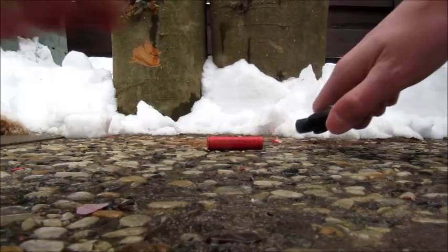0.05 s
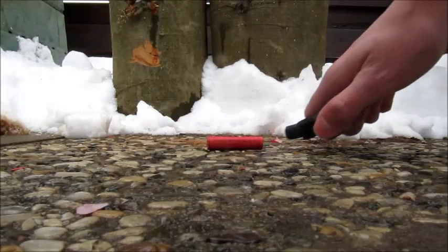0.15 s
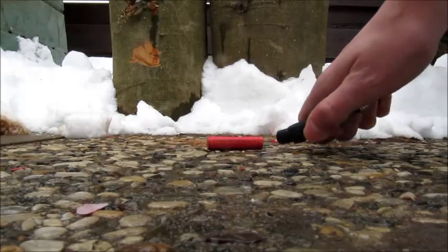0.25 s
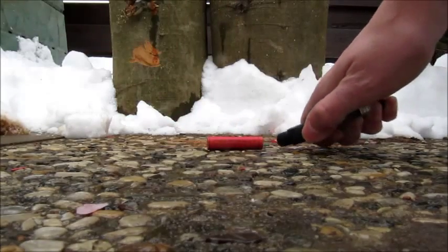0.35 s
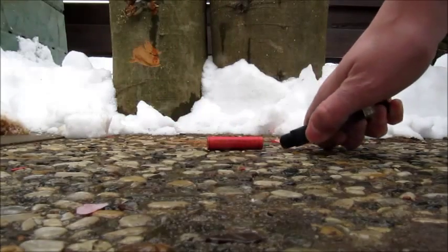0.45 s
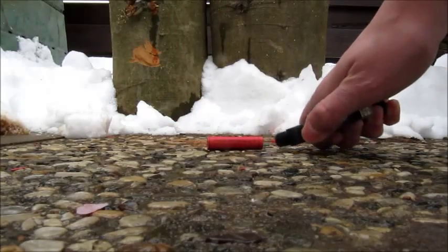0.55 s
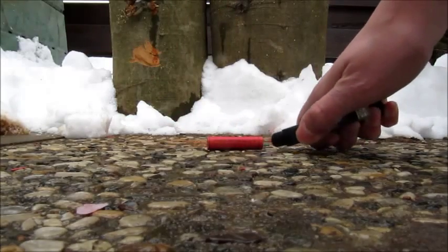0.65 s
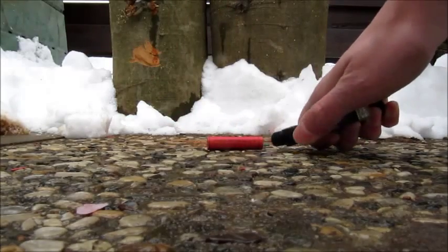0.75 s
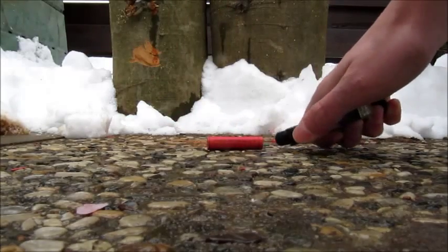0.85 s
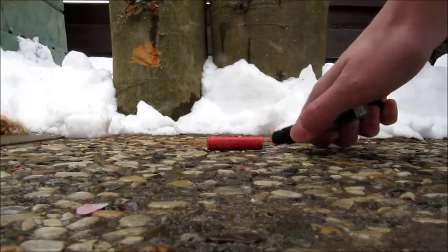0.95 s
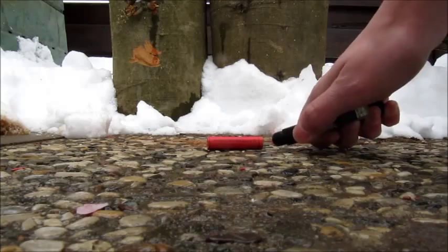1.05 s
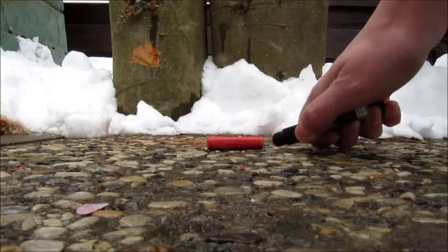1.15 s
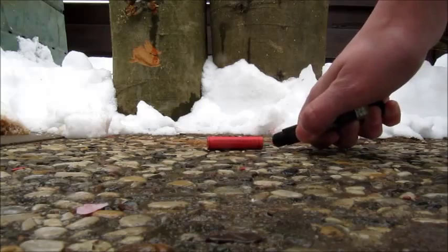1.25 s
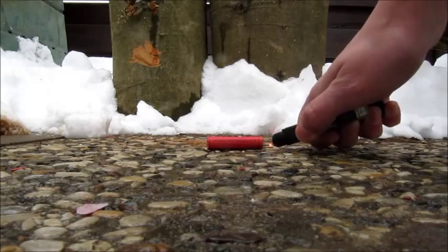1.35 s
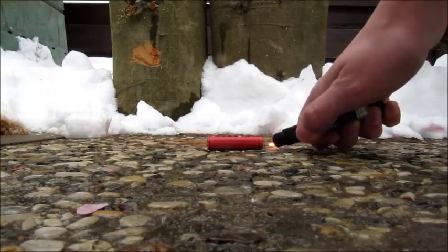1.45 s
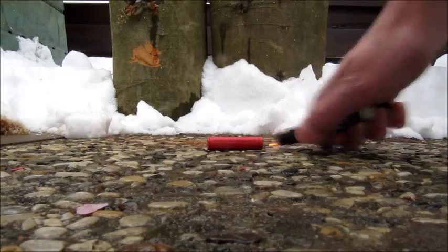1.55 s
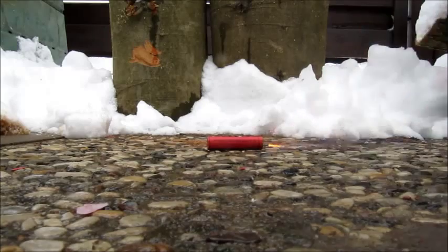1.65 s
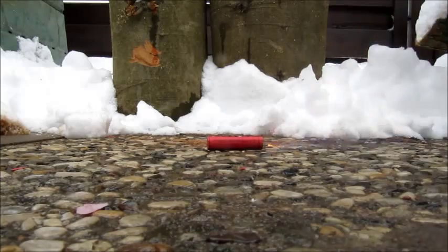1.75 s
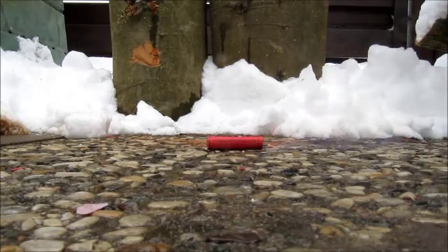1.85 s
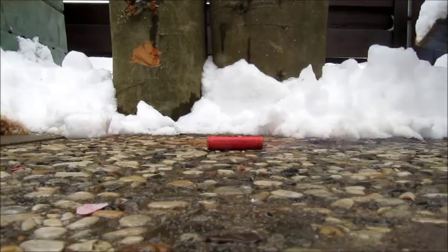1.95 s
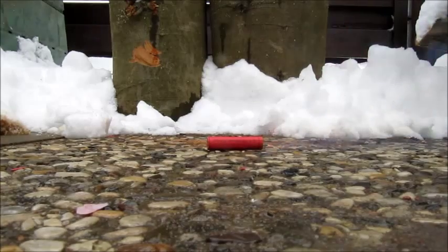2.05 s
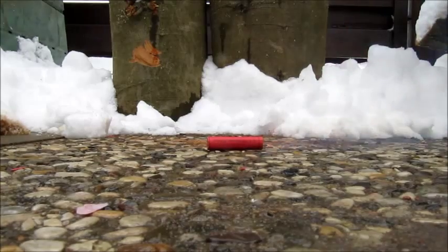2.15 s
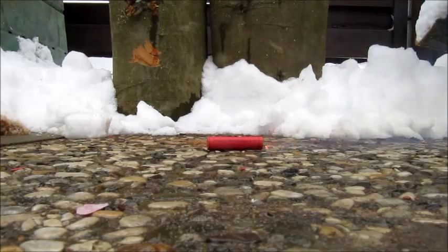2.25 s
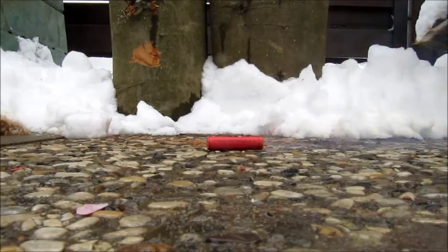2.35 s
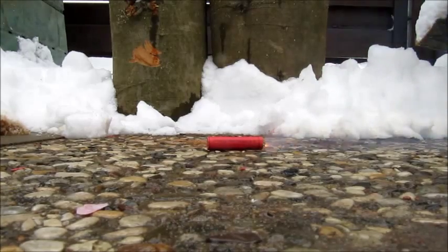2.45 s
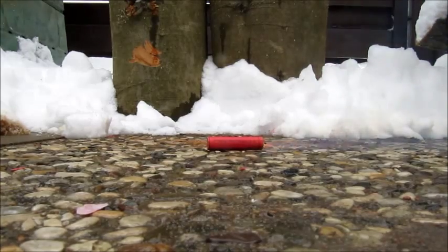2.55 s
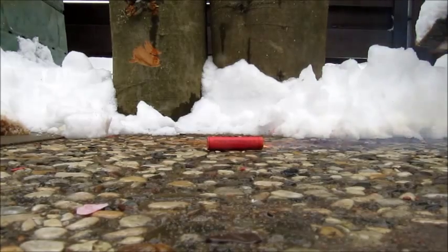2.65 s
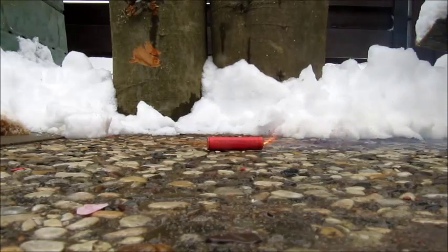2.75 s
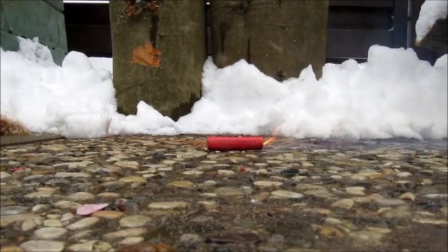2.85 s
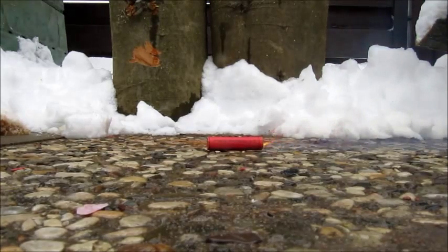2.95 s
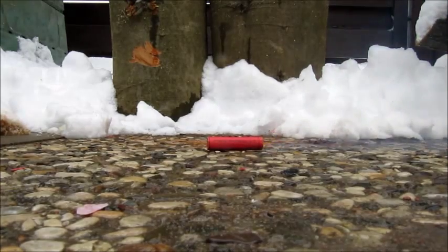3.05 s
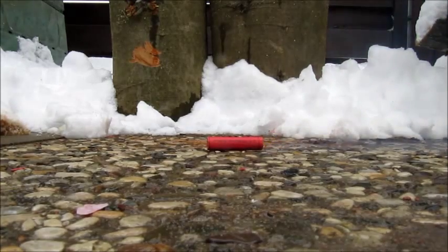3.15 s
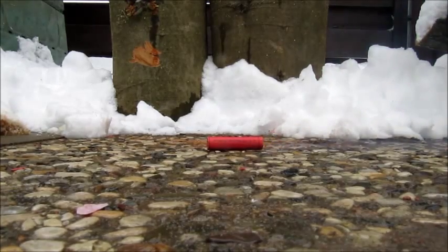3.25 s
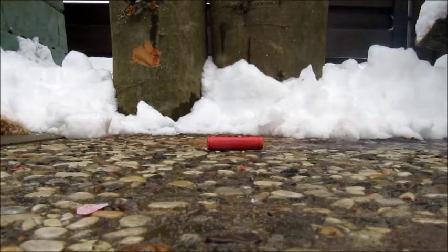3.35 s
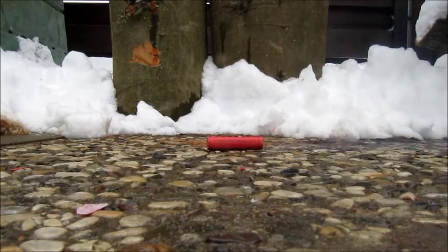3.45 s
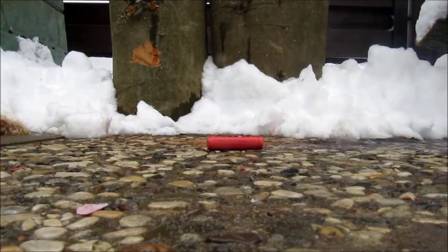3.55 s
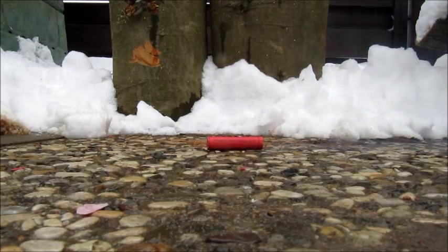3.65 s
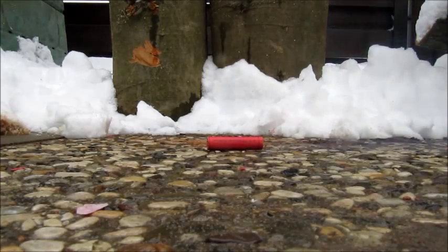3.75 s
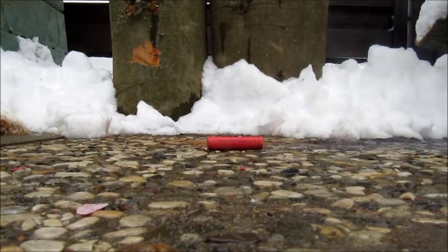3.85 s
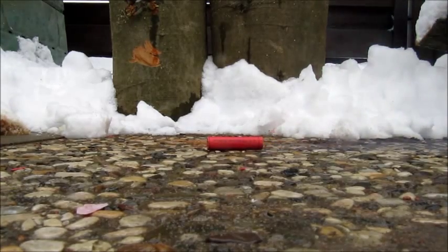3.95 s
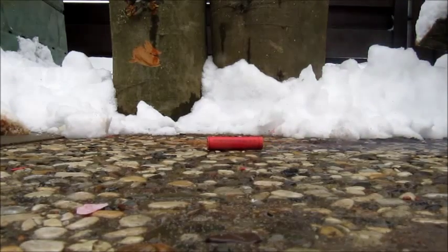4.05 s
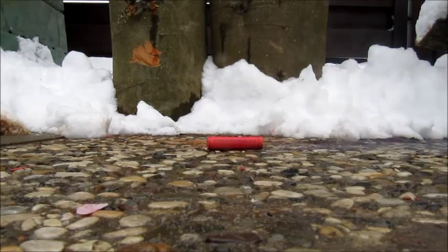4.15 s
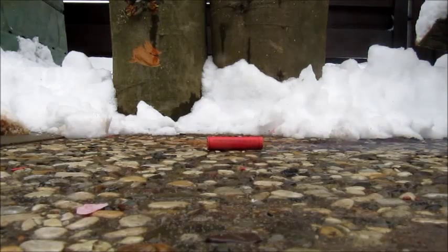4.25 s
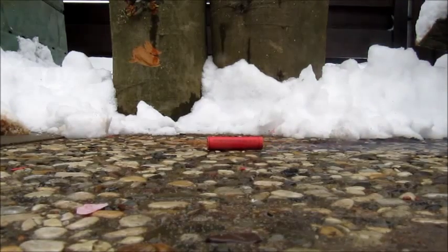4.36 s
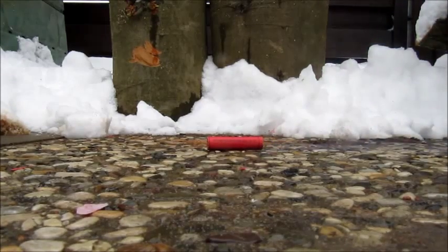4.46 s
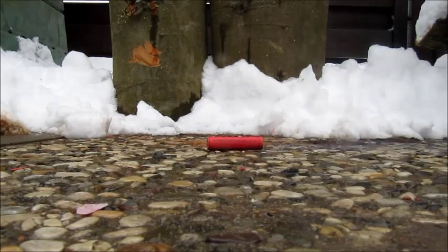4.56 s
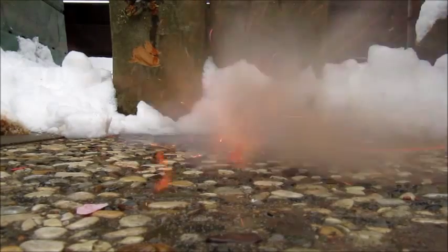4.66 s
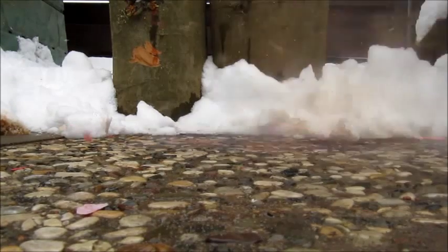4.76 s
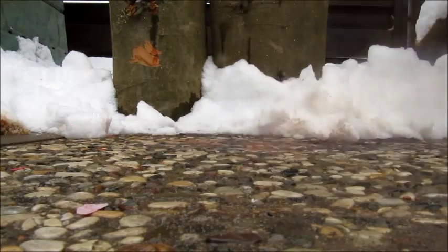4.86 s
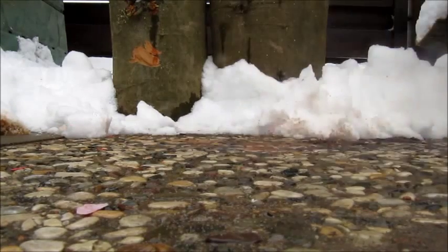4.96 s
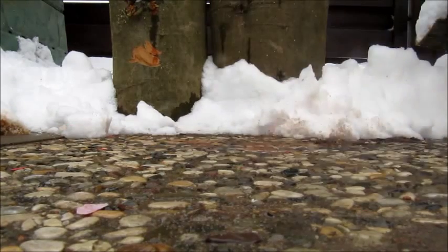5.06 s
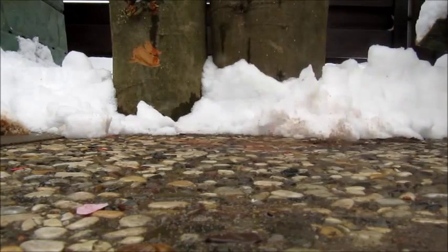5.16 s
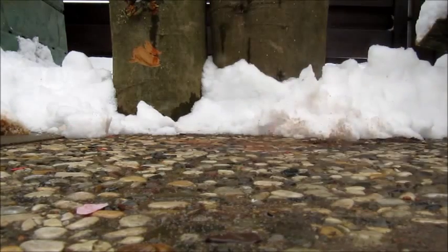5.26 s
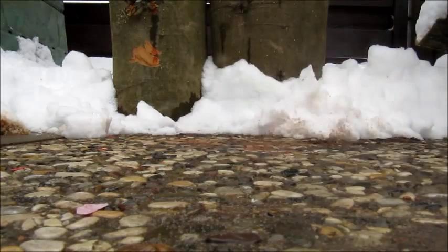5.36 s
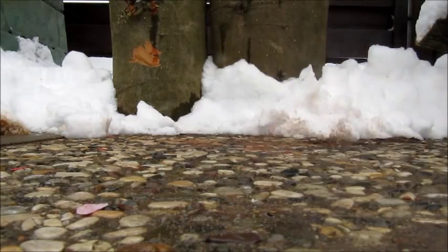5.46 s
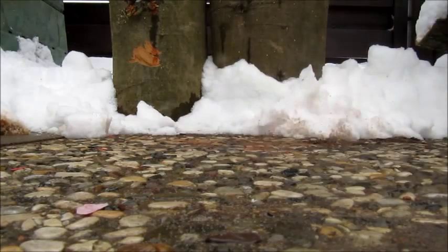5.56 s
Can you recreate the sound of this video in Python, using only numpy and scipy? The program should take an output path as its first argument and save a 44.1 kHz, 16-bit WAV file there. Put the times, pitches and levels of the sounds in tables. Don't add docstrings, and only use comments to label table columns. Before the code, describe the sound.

Close outdoor recording in a small fenced yard. Wind buffets, then gas hisses as a lighter clicks sharply several times. A fuse catches, fizzing brightly with crackles, shrinks to a faint smoulder, then one violent distorted bang with short fence echoes. Small bits tick onto stone, and a torn shell clacks down.

```python
import sys
import numpy as np
from scipy import signal
from scipy.fft import rfft, irfft
from scipy.io import wavfile
from scipy.ndimage import uniform_filter1d

SR = 44100
rng = np.random.default_rng(int(sys.argv[2]) if len(sys.argv) > 2 else 0)


def transcribe(signal):
    frames = np.atleast_2d(signal).T
    limited = np.clip(frames, -1, 1)
    pcm = np.round(limited * 32767).astype(np.int16)
    wavfile.write(sys.argv[1], SR, pcm)


def ratio(d):
    e = np.asarray(d, float) / 20
    return 10 ** e


N = 247519
SPLIT_S = 2.715


def evened(x):
    return x / np.sqrt(np.mean(x ** 2) + 1e-20)


def read(points, hz):
    f, value = np.transpose(points)
    return np.interp(np.log(hz + 1), np.log(f + 1), value)


def columns(rows, t):
    s, *rest = np.transpose(rows)
    return [np.interp(t, s, c) for c in rest]


def hump(t, s, length):
    return ((t - s) / (length / 2)) ** 2


def add(mix, s, sound):
    part = mix[round(s * SR):][:len(sound)]
    part += sound[:len(part)]


def coloured(x, spectrum, lo=0, hi=SR):
    hz = np.fft.rfftfreq(len(x), 1 / SR) + 1
    edges = 1 / np.sqrt((1 + (lo / hz) ** 12) * (1 + (hz / hi) ** 12))
    return evened(irfft(rfft(x) * ratio(read(spectrum, hz)) * edges, len(x)))


def resonate(x, hz, width):
    turn = np.exp(2j * np.pi * np.cumsum(hz * np.ones(len(x))) / SR)
    r = np.exp(-np.pi * width / SR)
    slow = signal.lfilter([1 - r], [1, -r], x / turn)
    slow = signal.lfilter([1 - r], [1, -r], slow)
    return evened((turn * slow).real)


def flicker(ms):
    size = max(int(ms * SR / 1000), 2)
    return evened(uniform_filter1d(uniform_filter1d(rng.standard_normal(N), size), size))


def gain_db():
    # start in seconds, gain after it in dB.
    ducks = [
        (0.09, -1.5),
        (0.42, -23),
        (1.232, -15.5),
        (4.69, -27.5),
    ]
    climb_db_per_s, rest_db = 13.5, -9.5
    t, out = np.arange(N) / SR, np.zeros(N)
    for s, after_db in ducks:
        climbing = after_db + climb_db_per_s * (t - s)
        out = np.where(t < s, out, np.minimum(climbing, max(after_db, rest_db)))
    return uniform_filter1d(out, size=200)


def yard():
    # frequency in Hz, level in dB per Hz.
    murmur_spectrum = [(59, -30), (100, 0), (198, -13.5), (344, -17.5), (426, -7), (2900, -19.5),
                       (3590, -22), (5990, -24), (8970, -21), (16300, -41.5)]
    # middle in seconds, length in seconds, level in dB, pitch in Hz.
    tyres = [
        (5.041, .03, -70, 1380),
        (5.405, 0.18, -69.5, 1624),
    ]
    hush = coloured(rng.standard_normal(N), murmur_spectrum, 140)
    t, road = np.arange(N) / SR, rng.standard_normal(N)
    whine = 0
    for s, length, db, hz in tyres:
        whine = whine + ratio(db - 7.8 * hump(t, s, length) ** 2) * resonate(road, hz, 370)
    car_db = 7 * np.exp(-hump(t, *tyres[1][:2]))
    return ratio(-56 + gain_db() + car_db + 1.6 * flicker(60)) * hush + whine


def wind():
    # frequency in Hz, level in dB per Hz.
    gust_spectrum = [(12, -36), (20, 6), (92, -1.5), (232, -10), (335, -14), (447, -16.5), (491, -17.5),
                     (805, -27), (900, -31.5), (1170, -44), (1980, -120)]
    # time in seconds, pressure in dB.
    breeze = [(0, -39.5), (.4, -42.5), (1.0, -48), (1.9, -56.5), (2.75, -38.5), (3.25, -36), (3.98, -31.5),
              (4.25, -52.5), (5.61, -44)]
    # middle in seconds, length in seconds, pressure in dB, flutter over pressure in dB.
    gusts = [(0.079, 0.15, -29, -7.5), (0.324, 0.068, -37.5, -22), (0.497, 0.055, -56, -23),
             (0.597, 0.033, -52.5, 0.5), (0.672, 0.061, -48.5, -12), (0.765, 0.036, -49, -17),
             (0.888, 0.14, -45.5, -24), (0.963, 0.045, -49.8, -28), (1.1, 0.059, -65, -18),
             (1.47, 0.056, -52, -15), (1.715, 0.041, -50, -18), (1.86, 0.038, -74, -0.3),
             (2.1, 0.063, -53.5, -4.5), (2.224, 0.048, -61, 3), (2.67, 0.082, -60, 9),
             (2.98, 0.08, -40, 1.5), (3.29, 0.33, -39.6, 2.8), (3.498, 0.056, -37, -1.5),
             (3.65, 0.06, -36.5, -7.5), (3.719, 0.04, -35.5, -3.5), (3.811, 0.057, -37.5, 0.5),
             (3.892, 0.018, -35, -9), (3.956, 0.034, -42, -7), (4.143, 0.081, -41, 1),
             (4.362, 0.079, -44.5, -19), (4.487, 0.039, -46, -26.5), (4.889, 0.04, -47, -32),
             (5.217, 0.08, -65, -22.5), (5.312, 0.04, -66.5, -13.5), (5.49, 0.038, -53.5, -20)]
    # time in seconds, peak in dB, pitch in Hz.
    buffets = [(0.043, -9, 83), (0.066, -12, 139), (0.078, -8.5, 72.6), (0.12, -18, 276),
               (0.291, -27.5, 74.5), (0.591, -42, 124), (0.658, -40.5, 61.9), (0.955, -39.5, 79),
               (1.2245, -35.5, 260), (1.711, -47, 61.9), (2.948, -36, 81.6), (2.988, -32, 216),
               (3.238, -23.5, 222), (3.258, -23, 83), (3.294, -23, 235), (3.339, -29, 167),
               (3.401, -27, 111), (3.428, -26, 89), (3.457, -25, 91.5), (3.499, -22, 133),
               (4.126, -26.5, 112), (4.879, -39, 80.7)]
    flutter_base_db, flutter_growth, gust_edge_db = -10, 0.93, -9.5
    t = np.arange(N) / SR
    slow = t[::64]
    breeze_db = columns(breeze, slow)[0] + np.interp(slow, t, gain_db())
    rumble = ratio(2 * breeze_db)
    flutter = ratio(2 * (flutter_base_db - 48 + flutter_growth * (breeze_db + 48)))
    for s, length, db, over_db in gusts:
        steeper_rise = np.where(slow < s, 1.8, 1)
        power = ratio(2 * (db + gust_edge_db * hump(slow, s, length) * steeper_rise))
        rumble = rumble + power
        flutter = flutter + ratio(2 * over_db) * power
    rumble_db = np.interp(t, slow, 10 * np.log10(rumble))
    flutter_db = np.interp(t, slow, 10 * np.log10(flutter))
    air = ratio(0.58 * flicker(37) + 3.4 * flicker(6.4)) * rng.standard_normal(N)
    edge_db = np.minimum(flutter_db, -38) - 12.5 + 1.3 * np.minimum(flutter_db + 35.5, 0)
    edge_db += 5.5 * flicker(12.0)
    out = ratio(rumble_db - 2.5) * coloured(air, gust_spectrum, 0, 110)
    out += ratio(flutter_db - 3.5) * coloured(air, gust_spectrum, 150, 300)
    out += ratio(edge_db) * coloured(air, gust_spectrum, 310)
    for s, db, hz in buffets:
        turns = np.arange(-1.5, 1.5, hz / SR)
        swing = np.sin(2 * np.pi * turns) * np.exp(-(turns / 0.4) ** 2)
        add(out, max(s + 0.0029 - 1 / hz, 0), ratio(db - 3.5) * swing)
    return out


def scrap(s, db, hz, ms):
    # frequency in Hz, level in dB per Hz.
    card_spectrum = [(120, -49.5), (200, -19), (2540, -16), (3110, -10), (4330, -12.5), (10100, -1.5),
                     (12400, -11), (16300, -33)]
    t = np.arange(2000) / SR
    burst = rng.standard_normal(2000)
    tick = 1.2 * min(hz / 8000, 1) * coloured(burst, card_spectrum) + resonate(burst, hz, 2400)
    tick *= ratio(-8 * (t * 1000 / ms) ** 1.6) * np.clip(t / 0.00034, 0, 1)
    return s - .0002, ratio(db) * tick / abs(tick).max()


def gas(rows, middle_db):
    # frequency in Hz, width in Hz.
    hollows = [(4200, 1200), (7000, 1200)]
    t = np.arange(rows[0][0] - .01, rows[-1][0] + 0.013, 1 / SR)
    flow_db, hz, turned = columns(rows, t)
    top_db = flow_db + gain_db()[round(t[0] * SR):][:len(t)]
    nozzle_db = -26.5 * turned
    air = rng.standard_normal(2 * SR)[:len(t)]
    jet = resonate(air, hz, 1500) + 0.08 * resonate(air, hz, 5000)
    jet -= ratio(middle_db) * resonate(air, *hollows[1])
    jet += ratio(nozzle_db) * resonate(air, *hollows[0])
    jet += ratio(nozzle_db - 10.0) * resonate(air[::-1], 5300, 1400)
    return t[0], ratio(top_db) * jet * signal.windows.tukey(len(t), .02)


def knock(s, db, hz, t60, thud_db):
    t = np.arange(3000) / SR
    mode = np.sin(2 * np.pi * hz * t) * ratio(-60 * t / t60) * np.clip(t / .0008, 0, 1)
    thud = ratio(thud_db) * np.exp(-hump(t, .0006, .0006))
    return s, ratio(db) * (mode + thud)


def snap(s, db, ms, bright_hz, body_db):
    # frequency in Hz, level in dB, t60 in seconds.
    body_modes = [(2980, -23, 0.1), (4400, 4.5, 0.026), (4500, -1.5, 0.027), (5230, -12, 0.011),
                  (6300, 5, 0.018), (6600, -19.5, 0.07), (6930, -2, 0.014), (8650, 6.5, 0.016),
                  (9840, 1.5, .018), (10260, -3, .018), (12100, -16, .012), (13700, -16.5, .008)]
    t = np.arange(4000) / SR
    chance = rng.standard_normal((4, 4000))
    wobble = 1 + 0.12 * evened(uniform_filter1d(chance[0], size=8))
    chatter = np.sin(2 * np.pi * np.cumsum(bright_hz * wobble) / SR)
    chatter *= np.sin(np.pi * np.clip(t * 1000 / ms, 0, 1)) ** 1.4
    struck = t * 2000 > ms
    blow = chance[1] * ratio(-20.5 - 60 * t / 0.021) * struck
    blow[int(ms * SR / 2500)] = 2.63
    quick, ring = np.zeros(4000), np.zeros(4000)
    for (hz, mode_db, t60), grip in zip(body_modes, chance[2]):
        hz *= 1 + .025 * np.tanh(grip)
        mode_db += body_db if hz < 5000 else -5 * abs(np.log2(hz / bright_hz))
        wave = ratio(mode_db) * np.sin(2 * np.pi * hz * t)
        quick += wave * ratio(-60 * t / 0.0055)
        ring += wave * ratio(-60 * t / t60)
    body = signal.fftconvolve(blow, quick + ratio(-10.0) * ring)[:4000]
    spring = ratio(-21 - 60 * t / .028) * struck * resonate(chance[3], bright_hz, 6000)
    small_body = signal.butter(4, 1350, 'high', fs=SR)
    sound = signal.lfilter(*small_body, chatter + 0.74 * body / abs(body).max() + spring)
    return s, ratio(db) * sound / abs(sound).max()


def flame_levels(t):
    # time in seconds, roar in dB, how much the narrowing jet favours fizz in dB.
    catching = [(1.26, -51.5, -33), (1.386, -52, -31), (1.402, -49, -18), (1.482, -43.5, -22),
                (1.6, -40, -17)]
    burning_on = [(1.64, -47.5, 2.2), (1.8, -42, 4.9), (2.0, -39.5, 6.5), (2.2, -36, 5.1), (2.45, -34, 3.5),
                  (2.65, -35, 7.8), (2.8, -35, 5.6), (3.15, -37.0, 10.4), (3.35, -43, 12.3),
                  (3.6, -39.5, 12.4), (3.9, -44, 16), (4.15, -43.5, 14.2), (4.365, -44, 14.5)]
    # middle in seconds, change in dB, length in seconds.
    sputters = [(1.681, -1, 0.04), (1.802, 1.8, 0.02), (1.827, -2, 0.018), (1.872, 2, 0.026),
                (1.908, -3.6, 0.022), (1.924, -1.2, 0.02), (1.973, 0.8, 0.13), (2.046, -0.5, 0.02),
                (2.118, -3.5, 0.03), (2.216, 3.5, 0.058), (2.243, 1.3, 0.018), (2.263, -2, 0.02),
                (2.295, -1.6, 0.09), (2.35, -1.5, 0.02), (2.37, 2, 0.017), (2.435, -2.2, 0.03),
                (2.503, -1.5, 0.03), (2.537, 1.2, 0.02), (2.636, 3, 0.039), (2.712, 2.2, 0.02),
                (2.767, -1.5, 0.065), (2.822, 2, 0.018), (3.011, -0.7, 0.02), (3.054, 1.1, 0.082),
                (3.105, 1, 0.018), (3.134, -2.5, 0.029), (3.187, 2, 0.039), (3.236, -1.2, 0.02),
                (3.26, 0.7, 0.02), (3.285, -1.8, 0.03), (3.32, 1.7, 0.02), (3.356, -1.2, 0.13),
                (3.461, 1.3, 0.02), (3.51, -2.5, 0.03), (3.58, 1.6, 0.065), (3.686, 1.9, 0.045),
                (3.703, 1, 0.02), (3.718, -1.4, 0.02), (3.824, 0.4, 0.09), (3.901, -2.1, 0.061),
                (3.994, 0.6, 0.13), (4.068, -2.2, 0.03), (4.15, -3.5, 0.03), (4.21, 1.6, 0.065),
                (4.288, -1.5, 0.059), (4.35, 1.5, 0.02)]
    # middle in seconds, change in dB, length in seconds.
    puffs = [
        (4.513, 3, .05),
        (4.552, -7, 0.018),
        (4.616, -2, .03),
        (4.636, -2, .03),
    ]
    # start in seconds, change in dB, seconds to even out.
    jolts = [(2.197, 0.5, 0.04), (2.255, -1.5, 0.05), (2.36, 0, 0.04), (2.612, 1, 0.04)]
    swallow_s, swallow_fall_s = 4.374, .018
    swallow_db, smoulder_db_per_s = -20, -30.5
    rush_s, rush_rise_s, rush_db, rush_fizz_db = 4.668, .013, 13, 11
    split_db, split_hold_s, split_fade_db_per_s = 21.5, 0.8, 21.5
    roar, narrow = columns(np.vstack([catching, burning_on]), t)
    roar = roar + sum(db * np.exp(-hump(t, s, length)) for s, db, length in sputters + puffs)
    roar += sum(db * (t > s) * np.exp(-abs(t - s) / even) for s, db, even in jolts)
    roar += swallow_db * np.clip((t - swallow_s) / swallow_fall_s, 0, 1)
    roar += smoulder_db_per_s * np.maximum(t - swallow_s, 0)
    rush = np.clip((t - rush_s) / rush_rise_s, 0, 1)
    roar, narrow = roar + rush_db * rush, narrow + rush_fizz_db * rush
    split_fade = split_fade_db_per_s * np.clip(t - SPLIT_S - split_hold_s, 0, .7)
    split = np.clip((t - SPLIT_S) / 0.01, 0, 1) * (split_db - split_fade)
    torch_times = [catching[1][0], catching[3][0], catching[-1][0] - .015, catching[-1][0]]
    torch = np.interp(t, torch_times, [-12.5, 0, -2, -30])
    spit = np.maximum(roar + narrow - 30 + split, roar - 2.5 + torch)
    rumble = roar - 10 - 0.29 * np.maximum(narrow, 0)
    return roar + narrow, roar, rumble, spit


def fuse():
    # frequency in Hz, level in dB per Hz.
    flame_spectrum = [(180, -46.5), (300, -21), (548, -14.5), (704, -23), (889, -14.5), (1120, -18.5),
                      (1350, -16.5), (1820, -14.5), (3170, -9.5), (3390, -10.5), (5590, -9.5), (9080, 3.5),
                      (11700, -4.5), (15000, -37.5), (16300, -48.5)]
    # low edge in Hz, high edge in Hz.
    flame_bands = [(5500, 12000), (1500, 5500), (300, 1500), (12000, 17000)]
    # frequency in Hz, width
    # in Hz.
    ground_notches = [(5700, 2800), (9300, 800)]
    torch_leaves_s, reflection_share = 1.62, 0.63
    t = np.arange(N) / SR
    pops = ratio(2.9 * np.minimum(rng.exponential(1, N), 2.6))
    pops *= (rng.random(N) < 1500 / SR) * rng.choice([-1, 1], N)
    sputter = ratio(0.84 * flicker(4.5) + 0.5 * flicker(23))
    jet = evened(sputter * rng.standard_normal(N)) + 0.54 * evened(pops)
    levels = [np.interp(t, t[::32], db) for db in flame_levels(t[::32])]
    parts = [ratio(db) * coloured(jet, flame_spectrum, *band) for db, band in zip(levels, flame_bands)]
    sleeved = ratio(levels[0]) * coloured(jet, flame_spectrum, flame_bands[0][0], 10500)
    parts[0] += (sleeved - parts[0]) * np.clip((SPLIT_S - t) * 20, 0, 1)
    sparks = coloured(jet, [(1, 0), (2, 0)], 12300, 15000)
    parts.append(ratio(np.minimum(levels[1], levels[0] + 6) - 16.5) * sparks)
    burning = np.clip((t - 1.232) / 0.018, 0, 1) * (t < 4.6858)
    flame = shaded = burning * sum(parts)
    for hz, width in ground_notches:
        shaded = signal.lfilter(*signal.iirnotch(hz, hz / width, SR), shaded)
    reflected = reflection_share * np.clip((torch_leaves_s - t) / 0.043, 0, 1)
    return flame + reflected * (shaded - flame)


def bang():
    # start in seconds, dB over the overload point, t60 in seconds, treble edge in Hz.
    returns = [(4.6871, 11, 0.025, 9500), (4.69, 16, 0.065, 3300), (4.7015, 7, .045, 3500),
               (4.707, 5, .022, 5000), (4.70, -15, 0.37, 6500), (4.697, 9, 0.03, 6000),
               (4.7278, -17, 0.026, 14050), (4.7343, 2.5, 0.02, 8000), (4.7356, 3, 0.038, 3800),
               (4.7585, -25.5, 0.03, 12000), (4.762, -11.5, 0.23, 1500), (4.7673, -8, 0.035, 3000),
               (4.7713, -7, 0.045, 4500), (4.7762, -13, 0.046, 4000), (4.782, -19, 0.074, 5000),
               (4.80, -36, 0.19, 11800), (4.846, -23.5, 0.067, 3000), (4.896, -27, .12, 1745),
               (4.915, -45, 0.083, 1806), (4.919, -45, 0.7, 2470), (5.009, -56, 0.19, 4010)]
    # frequency in Hz, level in dB per Hz.
    blast_spectrum = [(35, -36.5), (60, -4), (124, -23), (157, -20), (484, -15.5), (1600, -7), (2440, -8),
                      (6090, -6.5), (6840, -4.5), (9730, 2.5), (16300, -32)]
    start, out = 4.6856, np.zeros(N)
    t = np.arange(32768) / SR
    drive = -5 * np.exp(-((t - .00047) / .00013) ** 2)
    drive -= 4 * np.exp(-((t - .00152) / .00014) ** 2)
    ringing = (t > .0006) * (t < .00145) * ratio(-60 * (t - .0006) / .006)
    drive += 2.5 * np.sin(2 * np.pi * 8800 * (t - .0006)) * ringing
    for s, db, t60, edge_hz in returns:
        age = t - (s - start)
        rush = coloured(rng.standard_normal(len(t)), blast_spectrum)
        rush = signal.lfilter(*signal.butter(2, min(edge_hz, 20000), fs=SR), rush)
        decay = ratio(db - 60 * (np.maximum(age, 0) / t60) ** 0.98)
        drive += rush * decay * np.clip(age / (0.011 * t60), 0, 1)
    drive += .28 * np.sin(np.pi * np.clip(t / .027, 0, 1) ** 1.5) ** 2
    ceiling = .205 + .04 * np.exp(-t / .012)
    ceiling += .27 / (1 + np.exp(np.minimum((t - .0012) / .00012, 50)))
    flat = ceiling * drive / (1 + abs(drive) ** 4) ** .25
    coupled = signal.lfilter(*signal.butter(1, 30, 'high', fs=SR), flat)
    add(out, start, np.clip(coupled, -ceiling, ceiling))
    return out


def scene():
    # start in seconds, peak in dB before overload, scrape in ms,
    # brightest frequency in Hz, low modes in dB.
    snaps = [(0.4155, 1, 1.5, 8100, -14), (0.4162, 0, 1.11, 6200, -8), (0.8193, -15, 0.84, 9500, -12),
             (0.819, -30, 1.2, 7200, -14), (0.8188, -33, 1.2, 12400, -10), (0.4178, -12, .7, 9900, -8),
             (1.2226, -14, 0.85, 7400, -10), (1.2232, -0.5, 0.89, 6830, -8), (1.2239, -6, 1.1, 4400, -6),
             (1.6149, -9.5, 2, 9420, -8), (1.6154, -13, 1.02, 6000, -4)]
    # start in seconds, peak in dB, pitch in Hz, t60 in seconds, thud in dB.
    knocks = [
        (.4166, -24, 1610, .014, -7),
        (.4168, -22, 4410, .03, -40),
        (.4172, -24, 8760, .045, -40),
        (.417, -21, 9900, .012, -40),
        (.417, -46, 2980, .12, -40),
        (.8194, -38, 1770, .02, -30),
        (.8196, -52, 6000, .09, -40),
        (1.2239, -23, 1590, .015, -9),
        (1.6152, -34, 1700, .015, -20),
        (1.6153, -24, 4300, .008, -40),
    ]
    # start in seconds, peak in dB, pitch in Hz, length in ms.
    shell = [(5.294, -66, 9550, 6.8), (5.3855, -54, 9000, 1.5), (5.4011, -19, 9900, 1.1),
             (5.4015, -23, 6000, .8), (5.4013, -30.5, 3200, 1.2), (5.403, -19, 10500, 0.45),
             (5.4036, -16, 10400, 1.1), (5.4063, -32, 11000, 0.6), (5.4075, -43, 11000, 1.1),
             (5.4084, -34, 5700, .9), (5.4118, -39, 8800, 0.7), (1.1, -52, 2100, 1.5),
             (.768, -68, 900, 1.7), (5.596, -58, 2600, 2), (5.5995, -53, 8900, 3), (5.602, -50, 8000, 4),
             (5.6015, -56, 3500, 5), (5.606, -53, 9500, 3), (5.3188, -54, 3400, 1.5),
             (5.3347, -58, 4000, 1.2)]
    # time in seconds, flow in dB, top hollow in Hz, nozzle turned away from 0 to 1.
    gas_flows = [
        [(0.13, -64, 8860, 0.4), (0.152, -46, 9000, 0.28), (0.19, -40, 8740, 0.42), (0.39, -40.5, 9430, 0.44),
         (0.58, -43.5, 9700, .45), (0.8, -44, 9250, .25), (1.01, -45, 9160, 0.29), (1.15, -44.5, 9600, 0.4),
         (1.22, -45, 9480, .2)],
        [(1.25, -53, 9880, 0.1), (1.386, -50.5, 10300, .5), (1.398, -39.5, 10600, 0.5),
         (1.496, -31.5, 10500, 0.9), (1.588, -35.5, 10000, .45), (1.604, -29.5, 9600, 0.8)],
    ]
    middle_hollow_db = [-13, -4]
    # start in seconds, peak in dB, pitch in Hz.
    scraps = [(4.4695, -42, 9900), (4.4966, -41, 9600), (4.5095, -40, 8500), (4.527, -40, 9500),
              (4.5613, -34.5, 9300), (4.5872, -38, 10300), (4.613, -41, 9500), (4.9244, -53.5, 9500),
              (4.9694, -67, 9500), (5.0745, -50.5, 9470), (5.106, -62, 8590), (5.128, -67, 8800),
              (5.133, -68, 11000), (5.148, -54, 10300), (5.152, -59, 4200), (5.1755, -62, 9500),
              (5.191, -65, 8500), (5.1954, -63, 8500), (5.2195, -62, 4000), (5.2227, -61, 9300),
              (5.234, -68, 9490), (5.249, -65, 9000), (5.2534, -66, 9000), (5.257, -64, 9000),
              (5.2695, -65, 9000), (5.281, -67.5, 8500), (5.2915, -61, 9000), (5.302, -63.5, 9000),
              (5.3184, -42, 8650), (5.3345, -50, 10000), (5.341, -55.5, 8500), (5.367, -55, 10970),
              (5.448, -52, 8600), (5.4972, -60, 9200), (5.516, -65, 9200), (5.5773, -59.5, 9200)]
    # start in seconds, peak in dB.
    crackles = [(1.7087, -25.8), (1.7246, -23.3), (1.8141, -22.2), (2.021, -15), (2.1256, -19.3),
                (2.164, -13.5), (2.1841, -13.3), (2.7167, -11.3), (3.1304, -11.0), (3.2459, -12),
                (3.2519, -11.5), (3.2612, -12.5), (3.8119, -12.1), (4.0258, -17), (4.1463, -16.9),
                (4.3012, -17)]
    mix = yard() + wind() + fuse() + bang()
    for row in snaps:
        add(mix, *snap(*row))
    for row in knocks:
        add(mix, *knock(*row))
    for row in shell:
        add(mix, *scrap(*row))
    for rows, middle_db in zip(gas_flows, middle_hollow_db):
        add(mix, *gas(rows, middle_db))
    for s, db, hz in scraps:
        add(mix, *scrap(s, db + 0.5, hz, ms=1.8))
    for s, db in crackles:
        add(mix, *scrap(s, db - 2, hz=4300, ms=.6))
    return mix[None]


def roll_off(x):
    return signal.sosfilt(signal.butter(12, 16680, fs=SR, output="sos"), x)


def record(dry):
    clipped = dry / (1 + abs(dry / .58) ** 6) ** (1 / 6)
    edge = signal.firwin(201, 15800, fs=SR)
    limited = signal.oaconvolve(clipped, edge[None], "same")
    return roll_off(limited)


dry = scene()
out = record(dry)
transcribe(out)
```